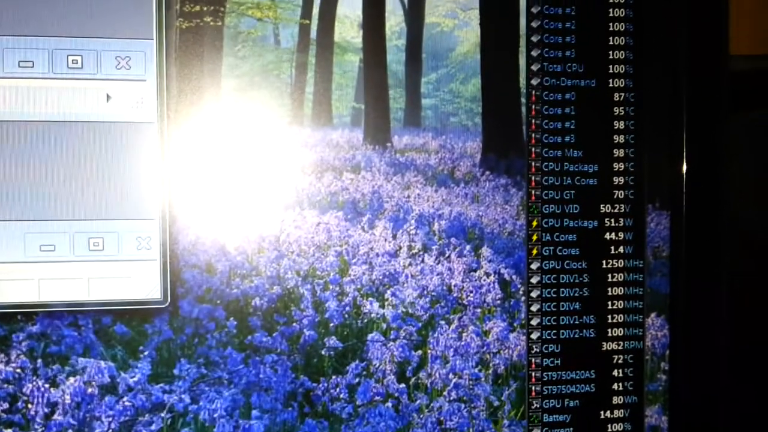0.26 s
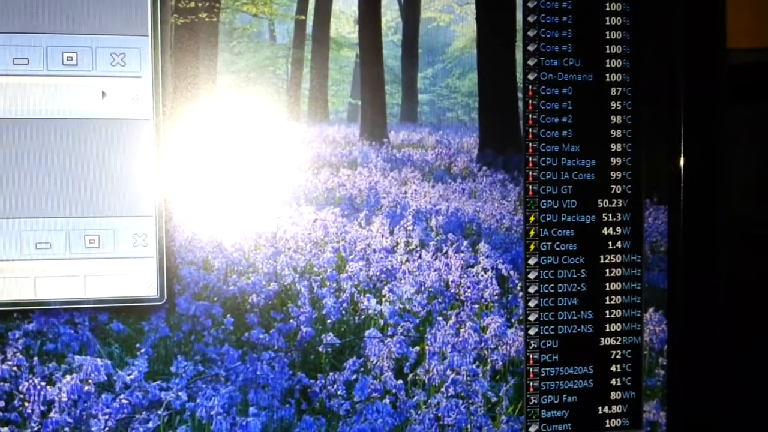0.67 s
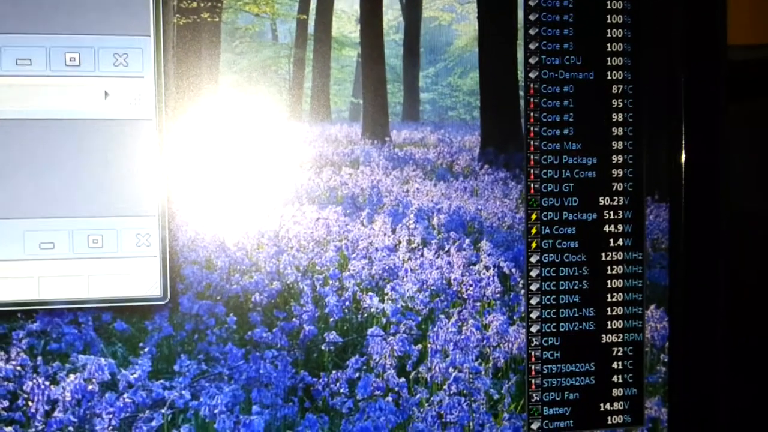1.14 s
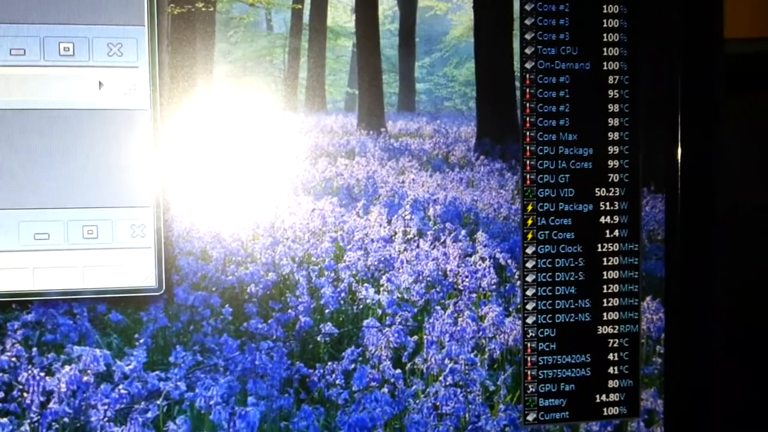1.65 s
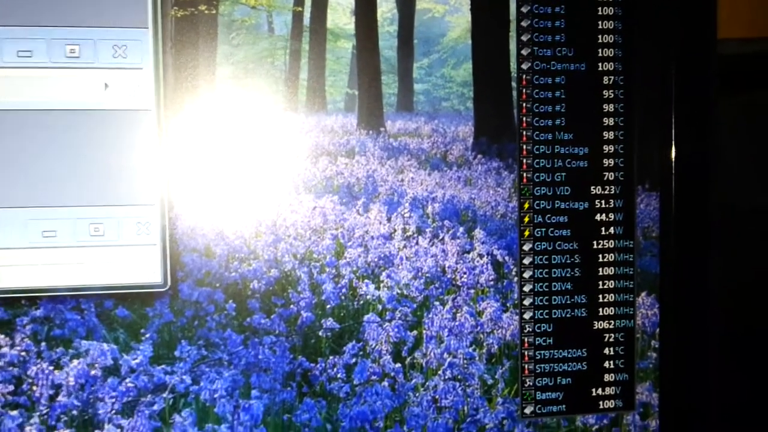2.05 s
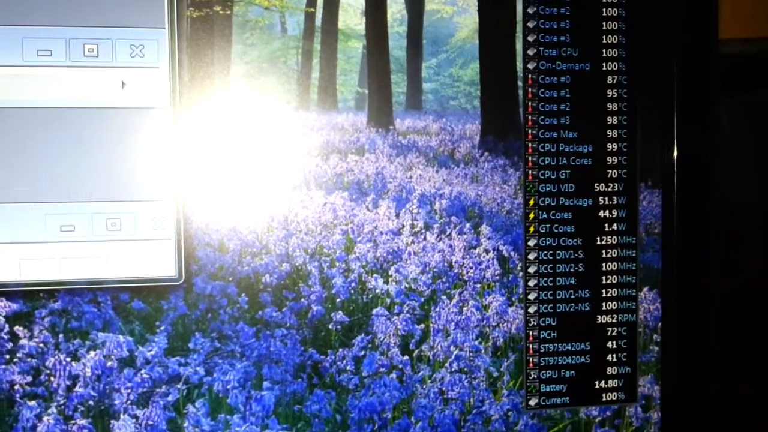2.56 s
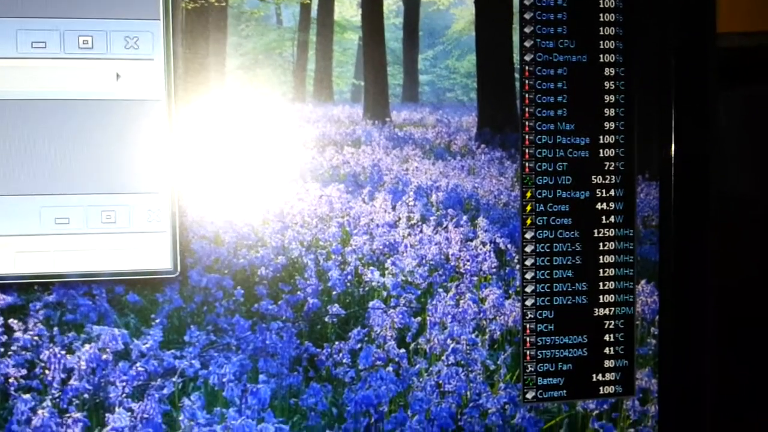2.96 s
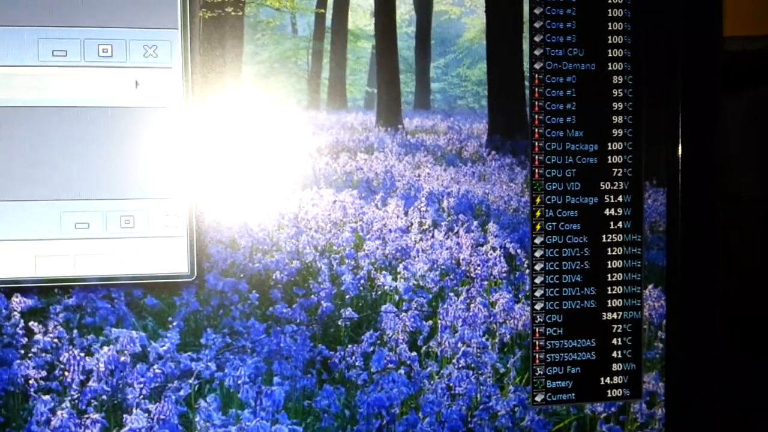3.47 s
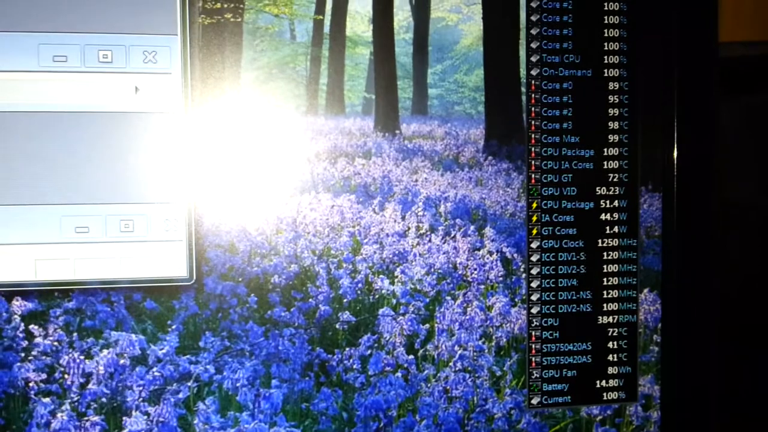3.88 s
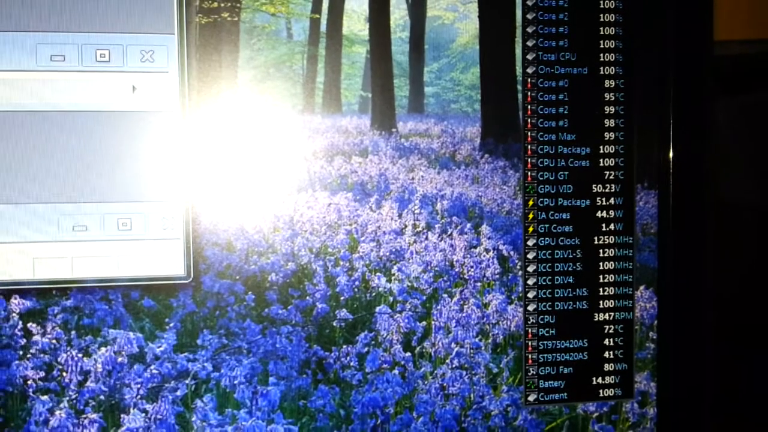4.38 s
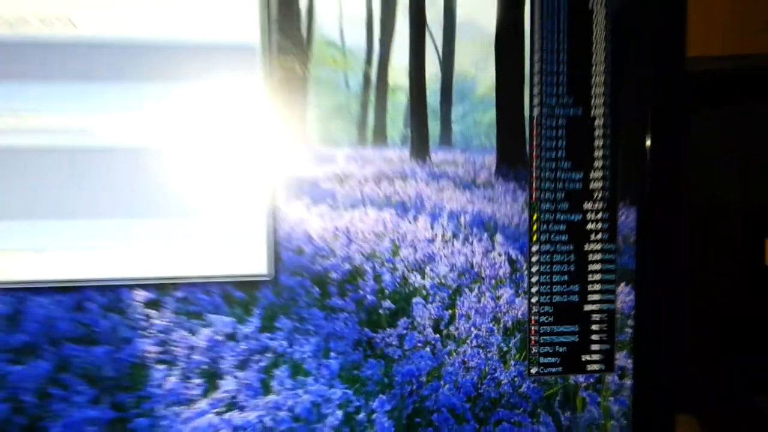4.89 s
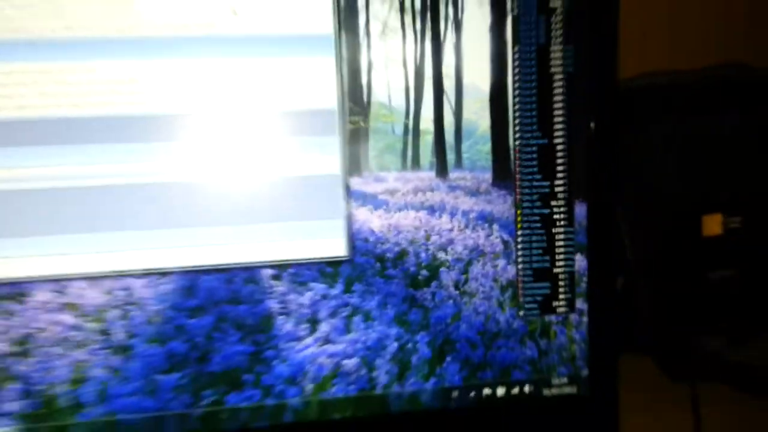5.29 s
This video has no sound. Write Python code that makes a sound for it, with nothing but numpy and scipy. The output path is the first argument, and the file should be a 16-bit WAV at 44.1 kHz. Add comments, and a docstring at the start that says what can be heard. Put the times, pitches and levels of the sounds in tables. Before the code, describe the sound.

Close, breathy whir of a laptop cooling fan with a steady motor whine, stepping up slightly in pitch, then receding at the end.

```python
"""Just in front of a laptop's screen: its 17-blade cooling fan steps up in speed and settles into a steady whir.
Shaft-locked sines make the motor and blade whine; shaped noise is the rush of air.
More noise rings the resonances of the vent on the left, and delayed copies are echoes off nearby surfaces.
Near the end the microphone draws back: the whine fades and the vent and echo colours slide down.
Beneath lie faint hiss and rumble, and very faint, soft low tone bursts at random times."""
import sys
import numpy as np
from scipy import signal
from scipy.fft import rfft, irfft
from scipy.io import wavfile
from scipy.ndimage import map_coordinates

SR = 44100
rng = np.random.default_rng(int(sys.argv[2]) if len(sys.argv) > 2 else 0)


def to_wav(s):
    """Save 16-bit WAV."""
    ch = np.atleast_2d(s).T  # columns
    pcm = np.round(np.clip(ch, -1, 1) * 32767)  # PCM
    wavfile.write(sys.argv[1], SR, pcm.astype(np.int16))


N = 243873
TIME_S = np.arange(N) / SR
FREQ_HZ = np.maximum(np.arange(N // 2 + 1) * SR / N, 1)

# faint floor, left then right port: treble_hiss_db_per_hz, burst_pitch_hz, mean_burst_peak_db
FAINT_FLOOR = [(-106, 174, -71.5), (-100.5, 146, -73)]
# surface echoes at the left port, before the retreat: delay_ms, strength
LEFT_ECHOES = [(2.52, 0.1), (3.24, 0.02), (3.97, 0.059)]
# surface echoes at the right port, before the retreat: delay_ms, strength
RIGHT_ECHOES = [(1.52, 0.081), (1.63, 0.14), (2.48, 0.045), (2.72, 0.092), (3.25, 0.034), (3.93, 0.042)]
# spectrum of the air rush, before mix gain: freq_hz, level_db_per_hz
RUSH_SPECTRUM = [(40, -132), (120, -130), (165, -107), (215, -96.5), (320, -90.5), (390, -82.7),
                 (520, -80.5), (680, -80.5), (800, -74.5), (980, -78), (1150, -76), (1550, -78),
                 (1850, -79.5), (3000, -81), (4700, -82.5), (5900, -91.5), (8300, -92), (14000, -108)]
# rush at the two ports: freq_hz, likeness_0_to_1, left_minus_right_db
RUSH_PORTS = [(130, 0, -7), (410, 0.77, -2.5), (813, 1, -2), (908, 0.24, 2), (1200, 0.11, -3.5),
              (1580, 0, 5.5), (1820, 0.05, -1), (2230, 0, -2.5), (3530, 0.1, 3), (8800, 0, 0),
              (10200, 0.34, 2.5), (13900, 0, -7.5)]
# vent and housing resonances, before mix gain and slide: freq_hz, width_hz, level_db_per_hz, retreat_loss_db
VENT_MODES = [(506, 150, -84.5, 8), (823, 167, -74, 6), (926, 67, -72.5, 5), (1257, 183, -72.5, -6),
              (1533, 210, -74.5, -1), (1720, 240, -77, 6), (2037, 187, -66, 1.5), (2177, 67, -65, 21),
              (2388, 276, -64.5, 5.5), (2396, 68, -67, 5), (2744, 145, -65, 7.5), (2943, 56, -77.5, -4),
              (3320, 120, -81, -3), (3787, 91, -71.5, 6), (4040, 57, -72, 3), (4370, 99, -71.5, 10),
              (4670, 440, -85.5, -2), (6200, 160, -89, 8), (7920, 540, -87, 9)]
# motor, blades, blade octave, left port before mix gain:
# shaft_multiple, rms_db, right_minus_left_db, wobble_db, dead_spot_dip_db
TONES = [(12, -61.5, 0, 1.5, 3), (17, -40, -5.5, 0.46, 0.5), (34, -47, -18, 0.3, 2)]

# shaft speed before and after the step; SPIN_UP_S is the rotor's time constant
SLOW_HZ, FAST_HZ, STEP_S, SPIN_UP_S = 71.15, 74.68, .69, .29
FLOW_POWER = 3.4  # fan amplitude against tip speed

# the microphone creeps towards the vent, then draws back
RETREAT_S, RETREAT_LENGTH_S, CREEP_DB_PER_S = 4.6, .85, 0.38
# mix gains at the closest point, and losses over the whole retreat
RUSH_DB, VENT_DB, WHINE_DB = 1.26, 0.17, 0.97
RUSH_LOSS_DB, WHINE_LOSS_DB = 2.4, 11.5
PATH_GROWTH, VENT_SLIDE = 0.17, .022  # retreat's share: longer echo paths, lower vent colour
SHADE_DB, FAR_SHADE_DB = -15.5, -7  # vent, right against left port: close, drawn back
VENT_LEFT_LAG_MS = 0.349
DEAD_SPOT_S, DEAD_SPOT_WIDTH_S = 4.6, 0.16  # centre, half width at 1/e of the dip
BURST_GAP_S, BURST_LENGTH_S = 0.18, 0.093  # mean spacing, length
TOP_HZ = 14500


def undb(db):
    """Decibels to gain."""
    return 10 ** (np.asarray(db) / 20)


def across(table):
    """Interpolate each column over log frequency."""
    hz, *columns = np.transpose(table)
    return [np.interp(np.log(FREQ_HZ), np.log(hz), column) for column in columns]


def filtered(x, gain):
    """Scale the spectrum by a gain curve, phase untouched."""
    return irfft(rfft(x) * gain, N)


def noise(gain):
    """Gaussian noise with the given amplitude per root hertz."""
    return filtered(rng.standard_normal(N), gain) * np.sqrt(SR / 2)


def walk(rate_hz):
    """Smooth random drift, zero mean, unit spread."""
    drift = noise(np.exp(-(FREQ_HZ / rate_hz) ** 2))
    return (drift - drift.mean()) / drift.std()


def delayed(x, lag_ms):
    """Interpolated delay, fixed or moving."""
    return map_coordinates(x, [np.arange(N) - lag_ms * SR / 1000], order=3, mode="mirror")


def tone_bursts(centre_hz, peak_db, spread_octaves=0.27, scatter_db=2.5):
    """Very faint, soft low tone bursts at random times, each with its own pitch and peak."""
    out = np.zeros(N)
    for k, (late, pitch, size) in enumerate(rng.standard_normal((100, 3))):
        age_s = TIME_S - (k + late / 2) * BURST_GAP_S
        now = np.abs(age_s) < BURST_LENGTH_S / 2
        age_s = age_s[now]
        pitch_hz = centre_hz * 2 ** (spread_octaves * pitch)
        swell = np.cos(np.pi * age_s / BURST_LENGTH_S) ** 2
        out[now] += swell * undb(peak_db + scatter_db * size) * np.sin(2 * np.pi * pitch_hz * age_s)
    return out


def self_noise(hiss_db_per_hz, sub_db_per_hz=-108, sub_hz=36):
    """The hand-held microphone's own treble hiss and steady sub rumble."""
    hiss = noise(undb(hiss_db_per_hz) * FREQ_HZ / (FREQ_HZ + 2000))
    rumble = noise(undb(sub_db_per_hz) / (1 + (FREQ_HZ / sub_hz) ** 2))
    return hiss + rumble


def faint_floor():
    """Self-noise and low tone bursts, drawn separately for each port."""
    ports = []
    for hiss_db_per_hz, burst_hz, burst_db in FAINT_FLOOR:
        ports.append(self_noise(hiss_db_per_hz) + tone_bursts(burst_hz, burst_db))
    return np.array(ports)


def surfaces(x, echoes, path, corner_hz=600):
    """Small surfaces reflect all but the bass and comb the sound; longer paths slide the comb down."""
    upper = filtered(x, FREQ_HZ ** 2 / (FREQ_HZ ** 2 + corner_hz ** 2))
    return x + sum(strength * delayed(upper, delay_ms * path) for delay_ms, strength in echoes)


def retreat():
    """How far the hand has drawn back, 0 to 1, with gentle start and stop."""
    progress = np.clip((TIME_S - RETREAT_S) / RETREAT_LENGTH_S, 0, 1)
    return np.sin(np.pi / 2 * progress) ** 2


def rush(gust_db=0.5):
    """Turbulent air fills the room: most alike at both ports near 800 Hz, mostly unrelated in the treble."""
    gain = undb(across(RUSH_SPECTRUM)[0])
    likeness, balance_db = across(RUSH_PORTS)
    likeness = np.clip(likeness, 0, 1)
    shared = noise(gain * np.sqrt(likeness))
    ports = []
    for side in (1, -1):  # left, right
        own = noise(gain * np.sqrt(1 - likeness))
        ports.append(filtered(shared + own, undb(side * balance_db / 2)))
    return np.array(ports) * undb(gust_db * walk(rate_hz=12.5))


def resonance(f_hz, centre_hz, width_hz, level_db):
    """Gain of one housing resonance at f_hz; it radiates little bass."""
    peak = undb(level_db) / (1 + (1.34 * (f_hz - centre_hz) / width_hz) ** 2)
    return peak * f_hz ** 2 / (f_hz ** 2 + (centre_hz / 4) ** 2)


def vent(turns, right_db, away, swirl=0.035, eddy_db=0.7):
    """Eddies ring the housing, harder once a turn; retreat reweights the modes and slides them down."""
    air = 0
    for centre_hz, width_hz, level_db, loss_db in VENT_MODES:
        ring = noise(resonance(FREQ_HZ, centre_hz, width_hz, level_db))
        air = air + ring * undb(eddy_db * walk(rate_hz=13) - loss_db * away)
    slide_s = np.cumsum(VENT_SLIDE * away) / SR  # growing delay lowers the pitch
    air = delayed(air, 1000 * slide_s)
    air = air * (1 + swirl * np.sin(2 * np.pi * turns))
    return np.array([delayed(air, VENT_LEFT_LAG_MS), air * undb(right_db)])


def shaft_speed():
    """Shaft turns per second: eases exponentially to the new speed and wavers slightly."""
    since_step_s = np.maximum(TIME_S - STEP_S, 0)
    hz = FAST_HZ + (SLOW_HZ - FAST_HZ) * np.exp(-since_step_s / SPIN_UP_S)
    return hz * (1 + .00015 * walk(rate_hz=3))


def whine(shaft_hz, turns, left_lag_ms=0.22):
    """Shaft-locked tones, weighted by the housing resonances, dip in a dead spot and wobble per port."""
    out = 0
    dead_spot = np.exp(-((TIME_S - DEAD_SPOT_S) / DEAD_SPOT_WIDTH_S) ** 2)
    for multiple, rms_db, right_db, wobble_db, dip_db in TONES:
        multiple = round(multiple)
        power = sum(resonance(multiple * shaft_hz, *mode[:3]) ** 2 for mode in VENT_MODES)
        housing = np.sqrt(power)
        tone = np.sqrt(2) * np.sin(2 * np.pi * multiple * turns)
        tone = tone * housing / np.median(housing)
        tone = tone * undb(rms_db - dip_db * dead_spot)
        wobble = undb(wobble_db * np.array([walk(rate_hz=14), walk(rate_hz=7)]))
        out = out + np.array([delayed(tone, left_lag_ms), tone * undb(right_db)]) * wobble
    return out


def scene():
    """One shaft speed drives tones and air loudness; the microphone's distance sets the mix."""
    shaft_hz = shaft_speed()
    turns = np.cumsum(shaft_hz) / SR
    flow = (shaft_hz / FAST_HZ) ** FLOW_POWER
    away = retreat()
    creep_db = CREEP_DB_PER_S * np.minimum(TIME_S - RETREAT_S, 0)
    rush_db = RUSH_DB - RUSH_LOSS_DB * away  # fills the room, so it fades little
    vent_db = VENT_DB + creep_db
    whine_db = WHINE_DB + creep_db - WHINE_LOSS_DB * away ** 3  # narrow beam: holds, then drops
    shade_db = SHADE_DB + (FAR_SHADE_DB - SHADE_DB) * away  # right port leaves the shade
    path = 1 + PATH_GROWTH * away
    left, right = rush() * undb(rush_db) + vent(turns, shade_db, away) * undb(vent_db)
    air = np.array([surfaces(left, LEFT_ECHOES, path), surfaces(right, RIGHT_ECHOES, path)])
    fan = flow * (air + whine(shaft_hz, turns) * undb(whine_db))
    return fan + faint_floor()


def record(dry):
    """The recorder cuts steeply above TOP_HZ with an elliptic low-pass."""
    return signal.sosfilt(signal.ellip(12, .1, 80, TOP_HZ, fs=SR, output="sos"), dry)


dry = scene()
out = record(dry)
to_wav(out)
```